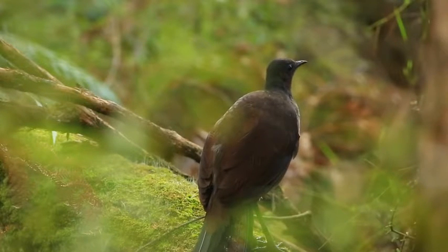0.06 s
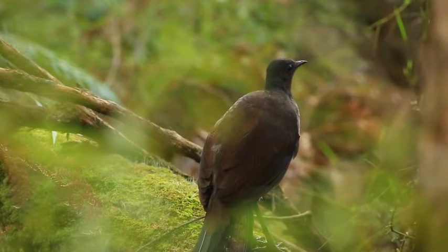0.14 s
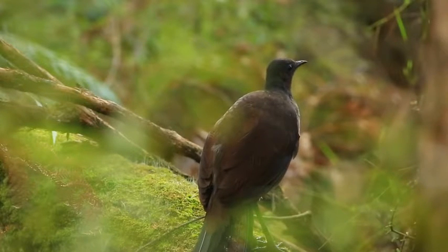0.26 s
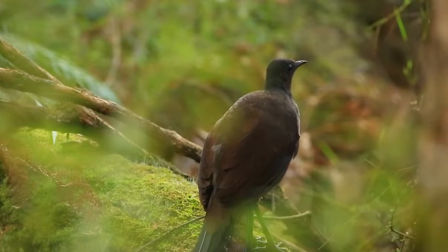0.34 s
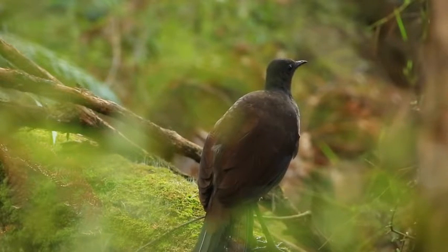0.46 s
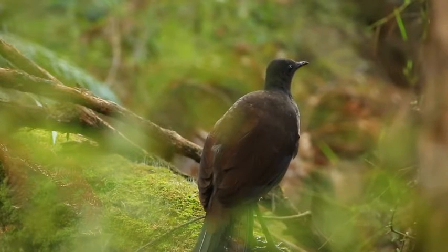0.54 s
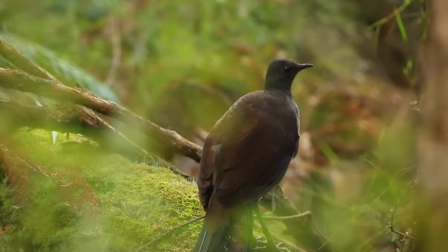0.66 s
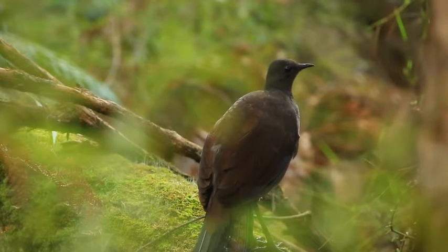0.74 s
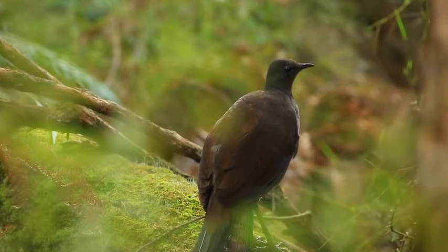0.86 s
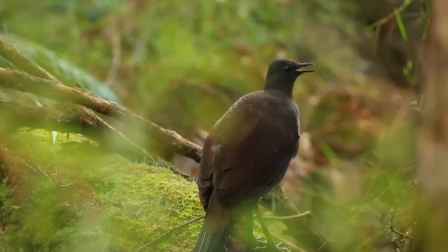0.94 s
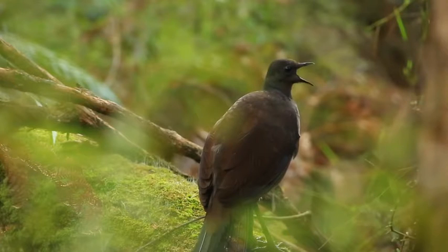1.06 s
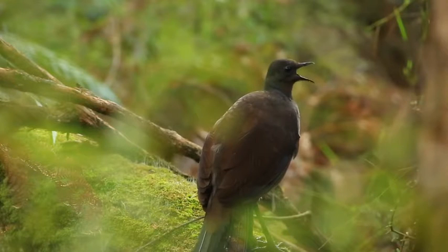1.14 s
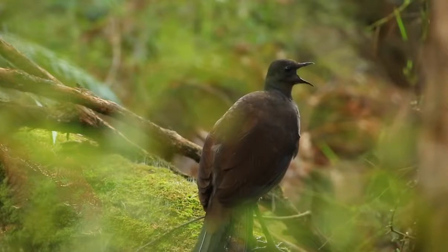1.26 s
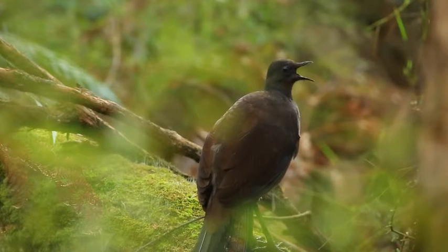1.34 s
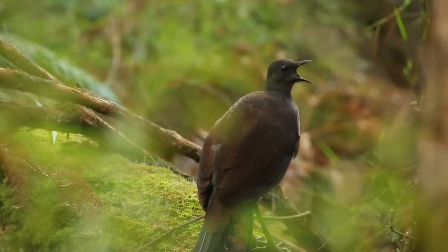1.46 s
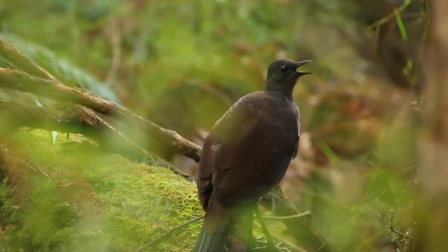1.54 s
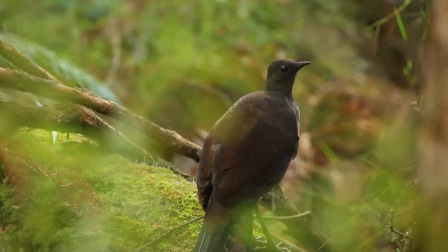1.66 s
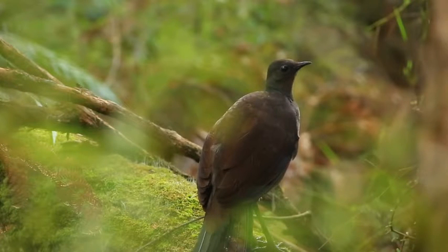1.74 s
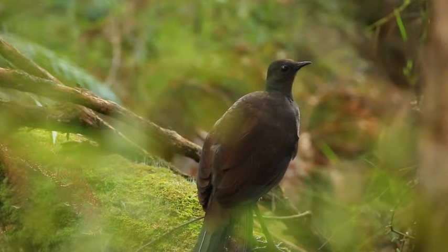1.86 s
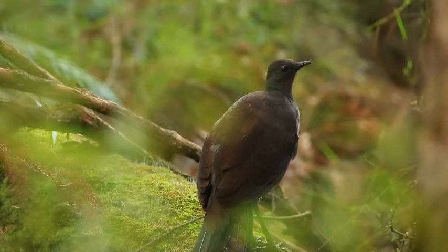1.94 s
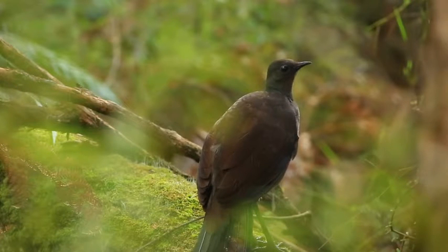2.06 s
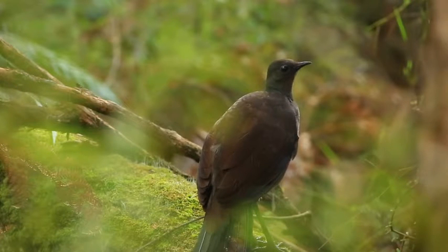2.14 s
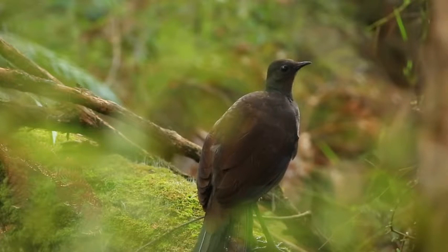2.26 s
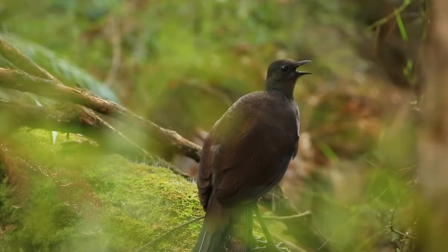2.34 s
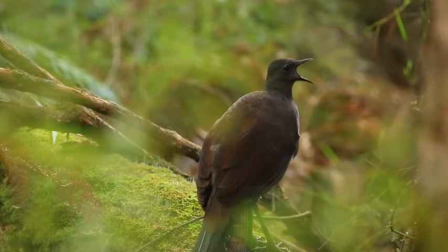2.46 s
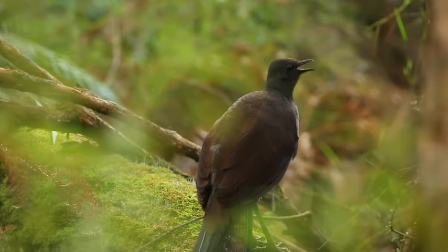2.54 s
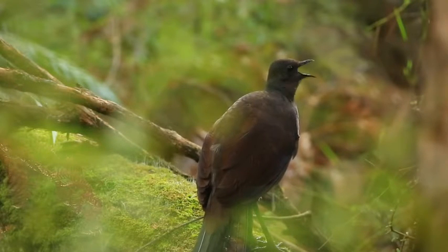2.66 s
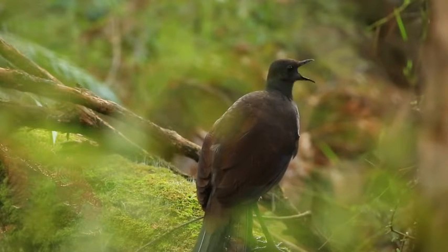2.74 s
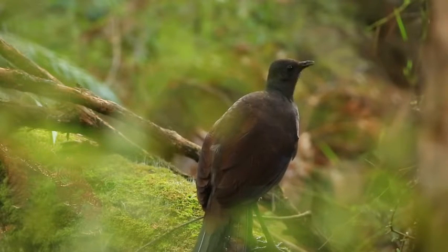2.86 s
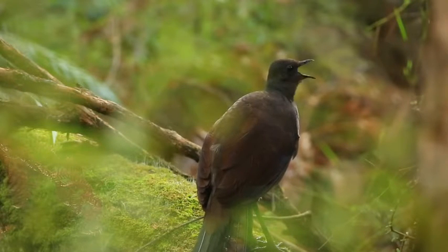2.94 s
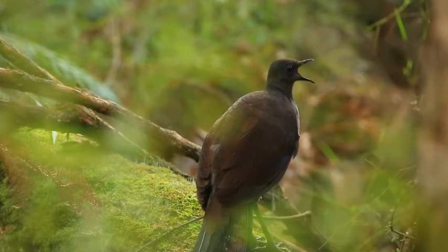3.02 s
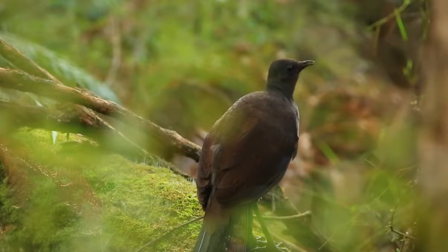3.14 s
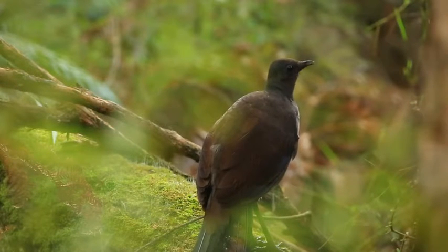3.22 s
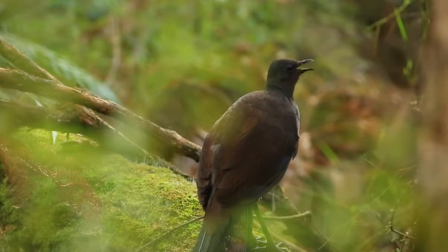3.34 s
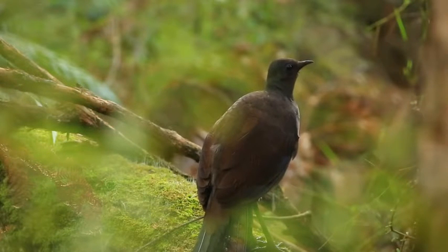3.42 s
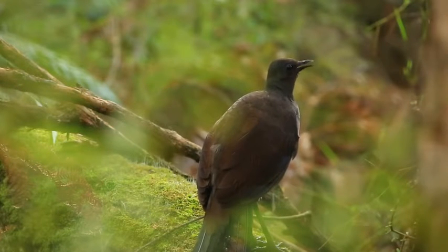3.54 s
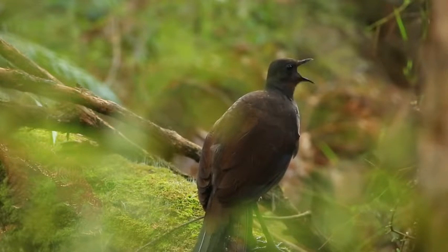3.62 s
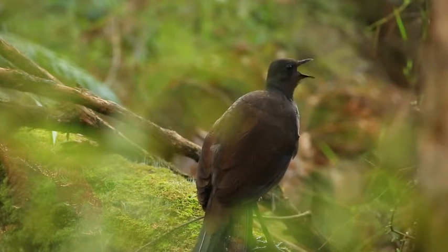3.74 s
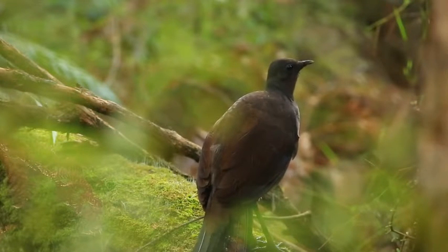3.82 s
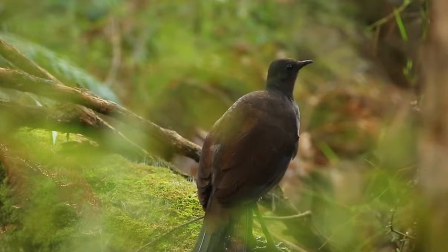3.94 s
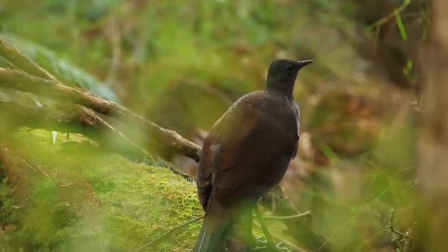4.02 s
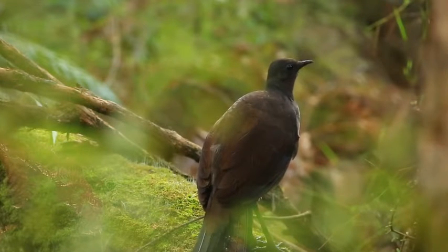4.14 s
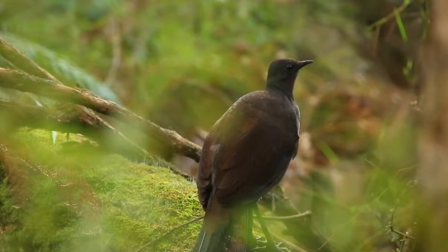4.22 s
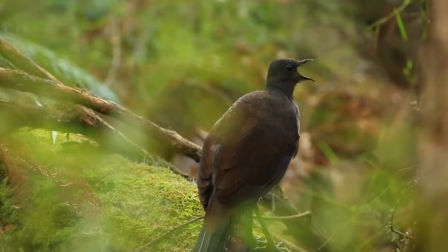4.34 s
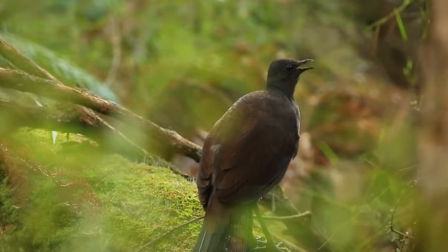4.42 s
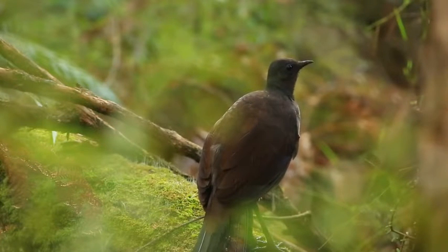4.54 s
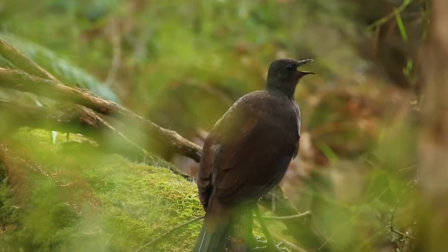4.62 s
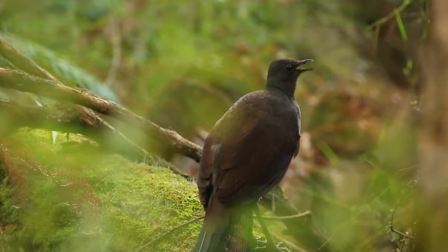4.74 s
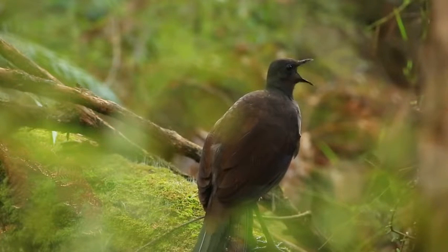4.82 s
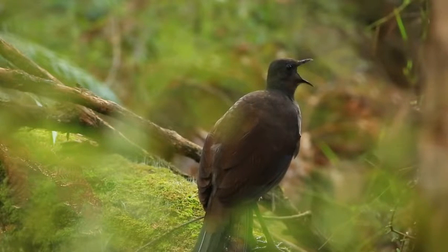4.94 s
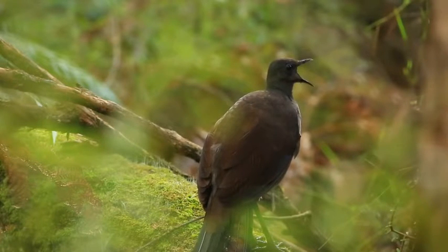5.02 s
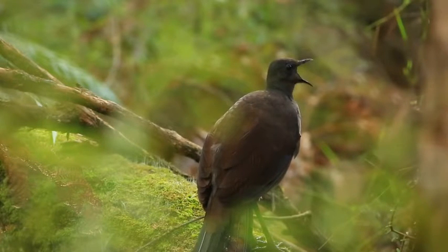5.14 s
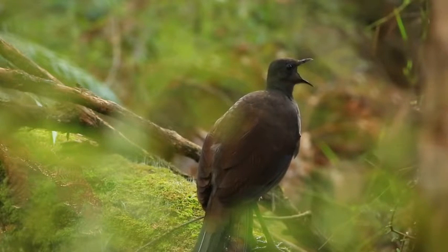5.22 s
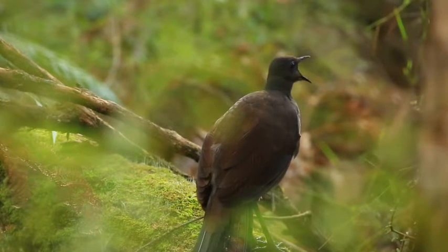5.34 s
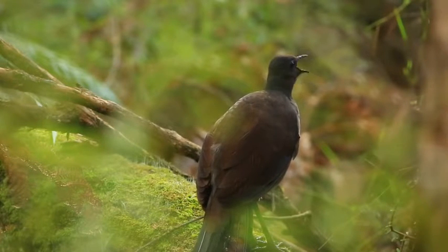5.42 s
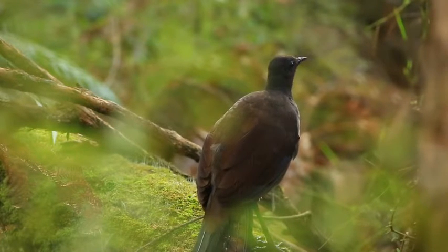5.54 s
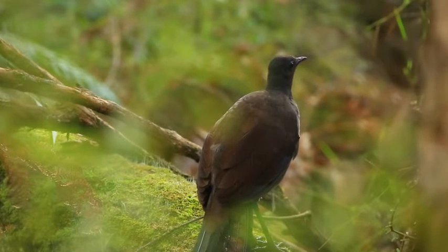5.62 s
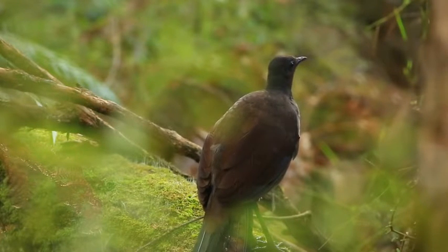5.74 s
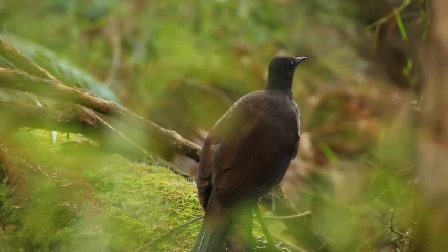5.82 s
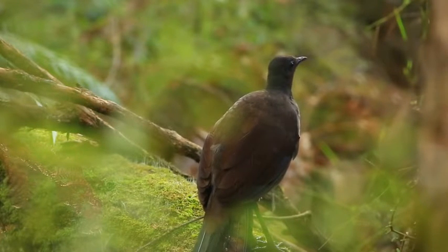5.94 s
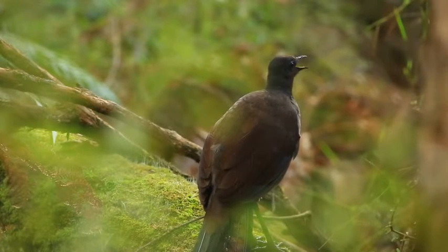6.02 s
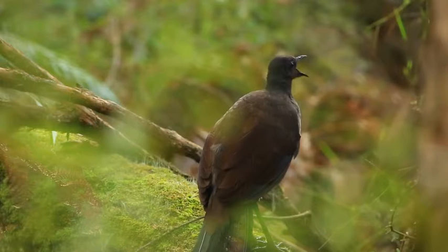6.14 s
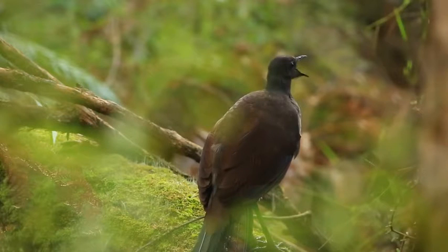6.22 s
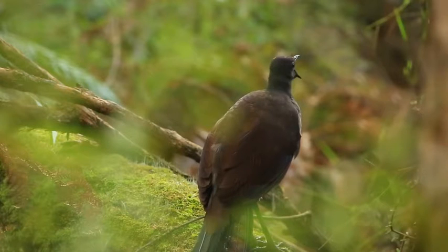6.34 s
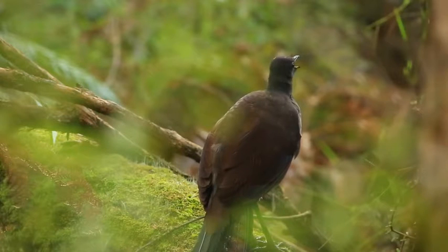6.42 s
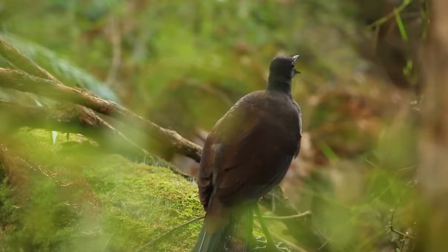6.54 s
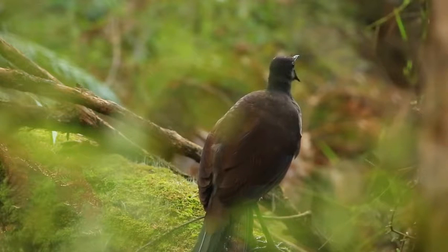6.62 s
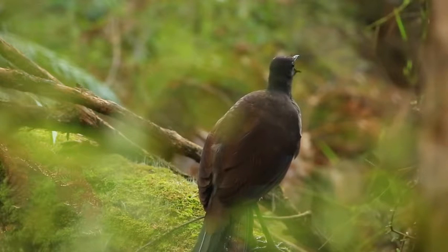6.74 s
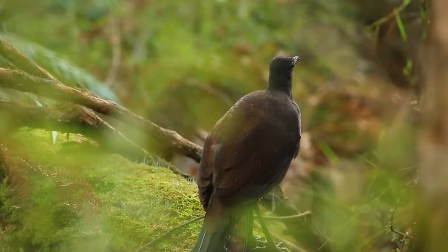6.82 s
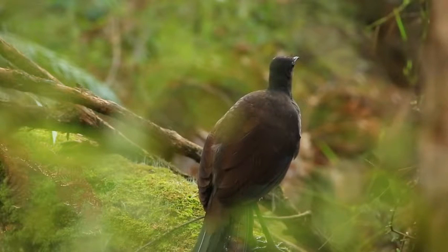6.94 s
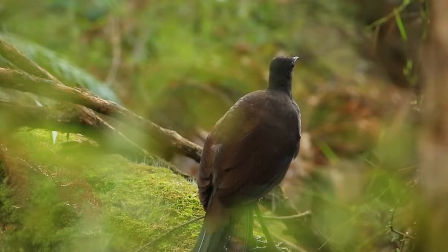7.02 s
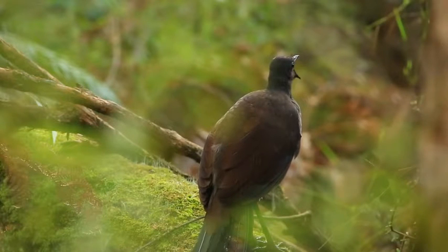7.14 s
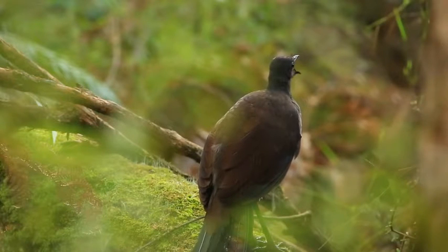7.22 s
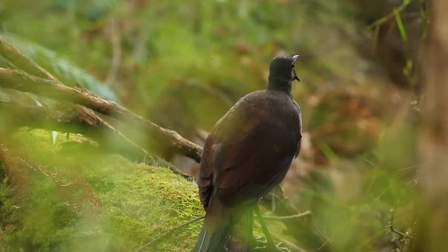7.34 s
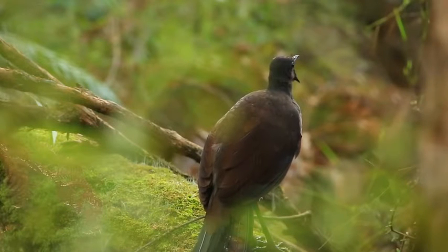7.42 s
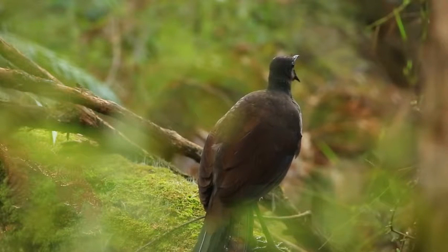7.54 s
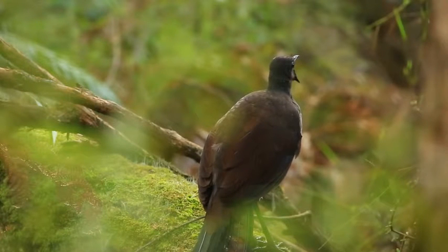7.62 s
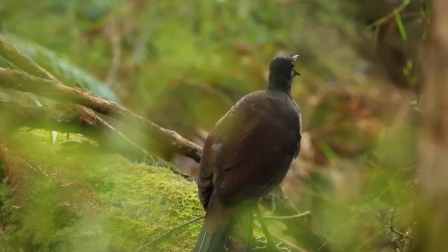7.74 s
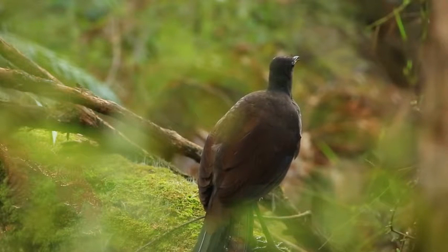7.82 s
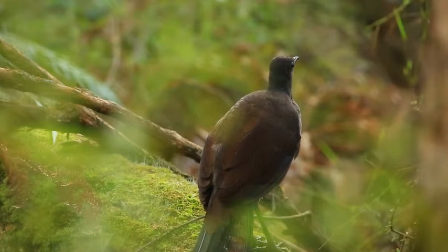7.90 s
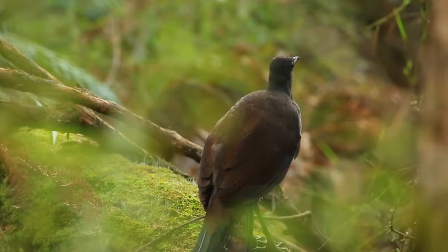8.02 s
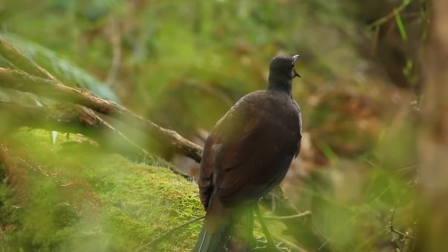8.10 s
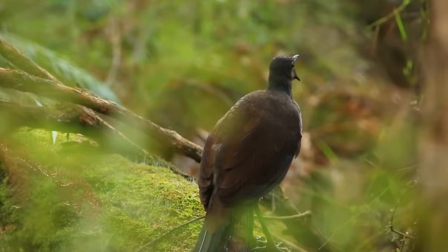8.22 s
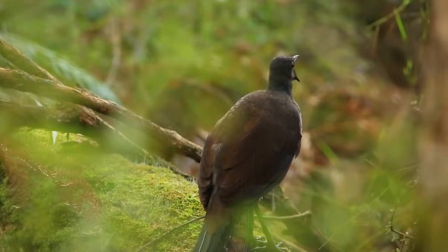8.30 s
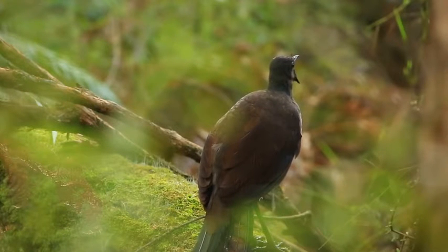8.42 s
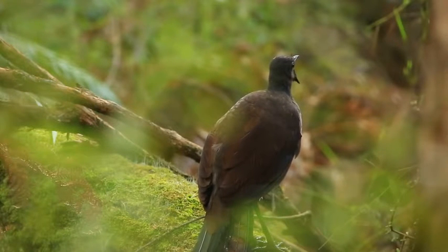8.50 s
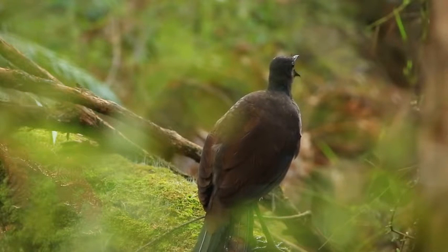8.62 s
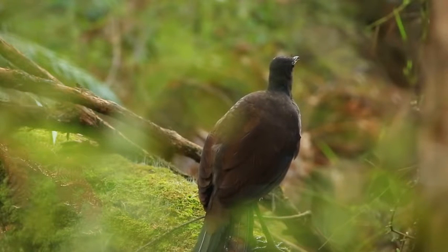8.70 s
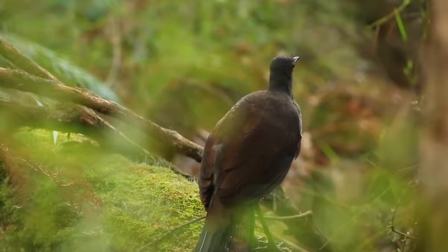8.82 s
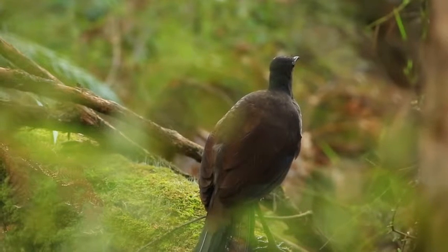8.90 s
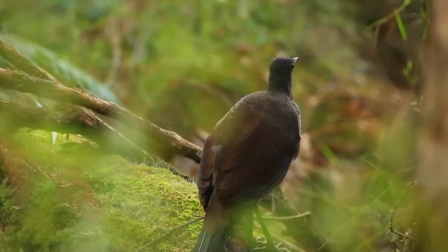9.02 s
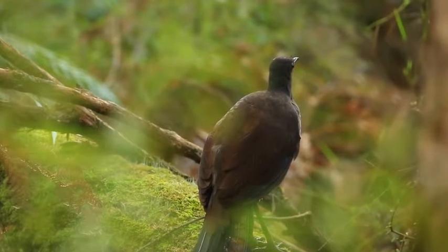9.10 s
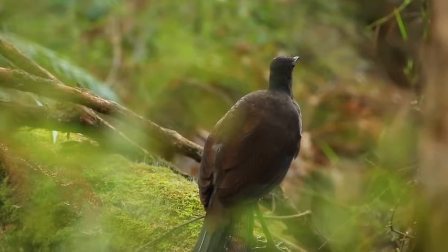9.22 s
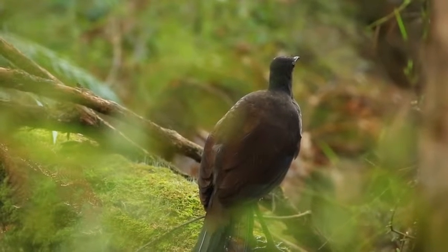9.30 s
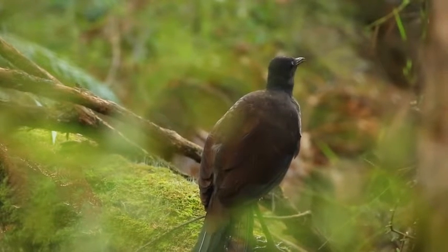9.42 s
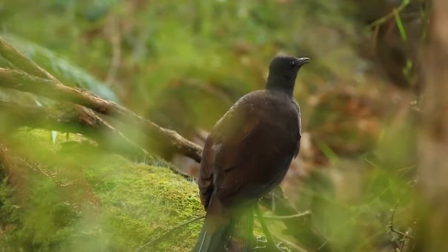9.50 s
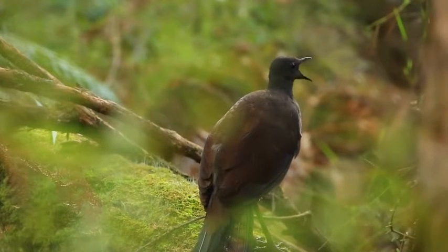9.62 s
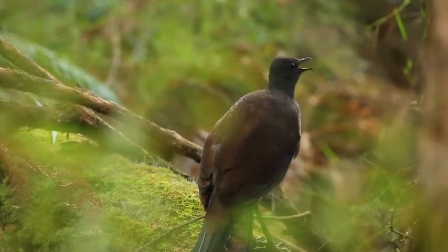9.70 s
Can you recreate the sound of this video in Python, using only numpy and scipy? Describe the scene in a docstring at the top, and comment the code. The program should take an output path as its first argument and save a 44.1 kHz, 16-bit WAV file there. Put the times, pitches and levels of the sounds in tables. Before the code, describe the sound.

In an echoing forest, a nearby bird utters low buzzy notes, harsh cracking chips and loud pitch-breaking whistles ending in rasps, over a soft stream-like murmur.

```python
"""In a forest, close to a bird: it sings whistles with sudden pitch breaks, low buzzy notes, harsh
rasps and clicks. Tones are sums of partials smeared by noise; rasps are pulse noise ringing a throat.
Ticks and rustles come from the undergrowth; farther off are one rising whip and faint gliding whistles.
Trees return a long scattered echo, made by sparse random taps; a stream of shaped noise murmurs behind."""
import sys
import numpy as np
from scipy import signal
from scipy.fft import rfft, irfft
from scipy.io import wavfile
from scipy.ndimage import uniform_filter1d

SR = 44100
rng = np.random.default_rng(int(sys.argv[2]) if len(sys.argv) > 2 else 0)


def master(y):
    """Save y as 16-bit WAV."""
    cut = np.clip(np.atleast_2d(y).T, -1, 1)
    pcm = np.round(cut * 32767)  # scale
    wavfile.write(sys.argv[1], SR, pcm.astype(np.int16))


N = 430416
EDGE_HZ = 15800  # upper band limit

# Long whistles: [extra roughness at the start, name of the overtone colour,
# (t/s, f/Hz, levels/dB of the fundamental, second and third partial)]
WHISTLES = [ (.01, "facing", [(4.905, 770, -49, -50.5, -48), (4.92, 1010, -34, -61, -63),
            (4.935, 1433, -27.5, -29, -31), (4.95, 1734, -29.5, -22.5, -32.5), (4.98, 1997, -26, -34, -39),
            (5.02, 2080, -18.5, -38, -44), (5.06, 2096, -15, -54, -41.5), (5.1, 2116, -11.5, -38, -44),
            (5.132, 2107, -16.5, -38, -45), (5.135, 2613, -15.5, -33, -46), (5.17, 2650, -18, -27.5, -46),
            (5.197, 2886, -24.5, -25, -44), (5.245, 2894, -10, -38, -47), (5.29, 2838, -27, -27.5, -45),
            (5.32, 2620, -14, -25, -46), (5.338, 2562, -19, -32, -43), (5.341, 2087, -13, -28, -40),
            (5.38, 2022, -17, -27.5, -36.5), (5.42, 1813, -27.5, -23, -34.5),
            (5.46, 1530, -27.5, -22.5, -43), (5.487, 1320, -21.5, -17, -48)]),
            (.01, "turned", [(6.34, 1298, -35, -42, -47), (6.37, 1360, -34.5, -43, -48),
            (6.4, 1670, -38, -30.5, -43), (6.42, 1773, -29.5, -36, -37.5), (6.46, 1662, -30, -31, -41),
            (6.5, 1649, -30.5, -33.5, -44.5), (6.55, 1527, -36, -35, -42), (6.6, 1381, -27.5, -55, -60),
            (6.68, 1320, -32.5, -45, -55), (6.74, 1447, -33, -33, -43), (6.772, 1435, -31, -27, -35)]),
            (.01, "aside", [(7.375, 1395, -49, -60, -56), (7.41, 1522, -41.5, -34, -44),
            (7.44, 1940, -26, -31, -47.5), (7.47, 1976, -16.5, -27, -53), (7.51, 1972, -19, -25, -45),
            (7.55, 1932, -14.5, -32, -44), (7.6, 1852, -31.5, -25.5, -33.5),
            (7.65, 1757, -26, -25.5, -28.5), (7.7, 1648, -22, -31, -40.5), (7.772, 1624, -24.5, -24, -31)]),
            (.5, "turned", [(8.3, 1400, -36, -34, -50), (8.33, 1587, -38, -35, -42),
            (8.37, 2000, -26, -32, -53), (8.405, 2224, -16.5, -34.5, -47), (8.408, 2650, -21, -33, -52),
            (8.44, 2740, -19, -33, -45), (8.46, 2687, -16.5, -33, -48), (8.475, 2658, -15.5, -48, -49),
            (8.53, 2604, -20.5, -32.5, -55), (8.575, 2554, -14, -31, -47), (8.579, 2157, -13, -32, -41),
            (8.615, 1980, -17.5, -22, -41), (8.64, 1830, -26, -29, -35), (8.678, 1795, -29, -22, -34)]), ]
# roughness of a settled whistle, and the time constant with which a hoarse start clears
CLEAR_ROUGHNESS, CLEARING_S = 0.015, 0.054
# Rasp under the hoarse start of a whistle: [t/s, level/dB, brightness/(dB per kHz)]
OPENING_RASP = [(8.285, -34, -18), (8.313, -26, -11), (8.33, -23, -0.9)]
# Rasp over a hoarse tone that ends each whistle: [start t/s, length t/s, first f/Hz, settled f/Hz,
# lowest f/Hz, last f/Hz, reference levels/dB of fundamental, second partial and rasp,
# brightness/(dB per kHz), factor on the roughness of the shared course]
ENDINGS = [(5.486, .083, 1310, 1235, 1084, 933, -28.5, -28, -23, -6.5, 0.8),
           (6.771, 0.13, 1186, 1111, 1051, 1294, -33, -33, -21, -1.76, 0.87),
           (7.772, .125, 1398, 1162, 1025, 1293, -31, -27, -22, -1.9, 1.1),
           (8.676, 0.12, 1513, 1322, 1053, 1520, -34, -32, -19.5, -1.4, 1.1)]
# Shared course of an ending: [share of its length, roughness, levels/dB relative to the row of
# fundamental, second partial and rasp]
ENDING_COURSE = [(0, 0.15, -2.5, -3, 4.5), (.16, .28, 4, 4.5, -2.5), (.7, .52, -10, 1.5, -3),
                 (1, 0.9, -4, 0, -13.5)]
# Harsh chips: [start t/s, buzz length t/s, buzz level/dB, crack level/dB, whistle length t/s,
# first f/Hz, shelf f/Hz, rise time constant t/s, later lift f/Hz, whistle level/dB,
# second partial level/dB, mid-whistle change of level/dB, its place 0-1, drop length t/s,
# closing rasp level/dB]
CHIPS = [(2.556, 0.041, -25, -20, 0.05, 1985, 2950, .009, 51.4, -19, -25, 5, 0.48, .012, -23),
         (2.836, 0.034, -30, -17, 0.052, 2134, 2880, 0.014, 59, -21.5, -30, -12, 0.47, .0055, -21),
         (3.118, .037, -29.5, -21, .049, 1996, 2860, .012, 139.5, -20, -28.5, -3.5, 0.59, .008, -19.5),
         (3.773, 0.04, -29, -14, 0.057, 2170, 2820, 0.015, 185, -20.5, -26, -7, 0.69, .008, -17.5)]
# the low and the high voice of the buzz: pitch, roughness, change of length against the buzz
BUZZ_HZ, BUZZ_ROUGHNESS, BUZZ_OVERLAP_S = (1010, 1764), (0.52, 0.82), (.004, -.0012)
# Course of a buzz: [share of its length, pitch ratio, levels/dB relative to the buzz of the low voice,
# high voice, overtones and rasp]
BUZZ_COURSE = [(0, .985, 0, 1.5, -0.5, -8), (.5, 1.003, -3.5, -5.5, -2.5, -7),
               (.85, 1.04, -3.5, 1, 3, -7.5), (1, 1.11, 7, 7, 1.5, -4)]
# the crack's level is reached half of CRACK_S into the whistle; both ends of the whistle are softened
CRACK_S, SWEEP_EDGE_S, SWEEP_START_DB, SWEEP_END_DB = 0.012, 0.0022, -23.5, -6
CHANGE_WIDTH = 0.17  # as a share of the whistle
# the drop after the whistle, levels relative to it, and the closing rasp's fade
DROP_HZ, DROP_ROUGHNESS, DROP_DB, DROP_SECOND_DB = 1028, .07, -10, -4
CLOSE_S, CLOSE_FADE_DB = 0.041, -20
# Low buzzy notes; the third partial grows as the beak opens: [t/s, f/Hz, roughness,
# levels/dB of the second and third partial]
LOW_NOTES = [
    [(1.115, 442.6, 0.3, -43, -59), (1.15, 451, .3, -46, -61), (1.175, 523, 0.24, -41, -43),
     (1.2, 588, 0.2, -42, -37.5), (1.23, 611, 0, -34.5, -40.5), (1.262, 543, 0.37, -42, -41)],
    [(1.327, 473, 0.31, -41, -50), (1.38, 493, 0.2, -35.5, -51), (1.405, 596, 0.3, -41, -37),
     (1.43, 645, .13, -34, -36), (1.455, 530, 0, -42, -52), (1.475, 482, 0, -39.5, -45)],
    [(1.54, 446, 0.37, -46, -45), (1.58, 456, 0.31, -43, -51), (1.615, 464, 0.27, -43, -51)],
    [(4.498, 670, 0.2, -37, -42.5), (4.52, 620, 0, -36, -45.5), (4.54, 546, 0, -49, -45),
     (4.56, 453, 0, -54, -51)],
    [(4.8, 627, 0.1, -35.5, -48), (4.85, 696, 0.12, -37.5, -43.5), (4.905, 733, 0, -55.5, -44.5)],
    [(6.2, 625, 0.77, -48, -60), (6.272, 587, 0.3, -44, -52), (6.3, 643, 0, -36.5, -44),
     (6.335, 854, 0.2, -43, -41)],
    [(7.25, 602, 0.75, -46, -58), (7.29, 717, 0.53, -44, -57), (7.32, 806, 0.26, -40, -39),
     (7.37, 850, 0, -50, -40)],
    [(8.26, 803, .57, -41, -54), (8.29, 889.3, 0.23, -34.5, -45), (8.325, 1064, 0.04, -27, -35)],
]
LOW_FUNDAMENTAL_DB = -7  # against the second partial
# Quick chirps: [t/s, f/Hz, roughness, level/dB of the fundamental]
CHIRPS = [
    [(2.664, 1510, .5, -42), (2.686, 750.1, 0.7, -41)],
    [(2.936, 1430, 0.54, -44), (2.956, 1150, 0.6, -35)],
    [(2.823, 4008, .06, -26), (2.829, 3940, .06, -25), (2.835, 2140, .06, -28)],
    [(3.098, 1240, .06, -63), (3.107, 3280, 0.1, -40), (3.113, 3740, .06, -23.5), (3.118, 2040, .06, -29)],
    [(3.226, 1400, .5, -63), (3.24, 1140, 0.7, -26.5)],
    [(3.422, 1086, .06, -49), (3.433, 980, .06, -38), (3.443, 1290, 0.1, -38)],
    [(3.445, 2290, .06, -35), (3.449, 3230, .06, -29), (3.453, 3660, .06, -48)],
    [(3.465, 2400, .06, -45), (3.48, 2034, 0.13, -34.5), (3.496, 1750, .06, -42)],
    [(3.755, 1910, .06, -48), (3.76, 3350, .06, -34), (3.765, 3570, 0.1, -27), (3.772, 2200, .06, -29)],
    [(3.885, 1200, 1.11, -17.5), (3.897, 1430, 0.6, -30)],
    [(9.608, 1128, .83, -44), (9.635, 794, 0.7, -37), (9.66, 747, 0.5, -34.5)],
]
CHIRP_SECOND_DB = -26  # against the fundamental
# Voiced clicks, a few cycles of the membrane: [t/s, level/dB, f/Hz, brightness/(dB per octave)]
CLICKS = [(1.277, -16.5, 1113, 0.5), (1.481, -16, 1114, 1), (1.629, -13.5, 1088, 2.7)]
# Spectrum of a click before its brightness: [level/dB], one value for each partial from 1 to 11
CLICK_PARTIALS = [10.5, 11.5, 0, 2, -8, -5.5, -15, -18, -21, -27.5, -25]
# Overtone colour of throat and beak for each way of singing and turn of the head: [f/Hz, level/dB]
COLOURS = { "facing": [(4000, 11), (5300, -8), (6300, -7), (7200, -14.5), (8400, -19.5), (10500, -17),
           (11500, -16), (14500, -37.5)], "turned": [(4000, -1.5), (5300, -13.5), (6500, -23), (8000, -27),
           (10800, -32.5), (13500, -40)], "aside": [(4500, 10), (5500, -11.5), (6600, -23), (8000, -19),
           (9800, -28.5), (13500, -40)], "quick": [(2000, 11), (3000, -6), (4500, -5), (6000, -5.5),
           (7500, -17.5), (9000, -22), (12000, -27), (15000, -48)], "hoarse": [(2000, 9), (2600, -1.5),
           (3300, -17.5), (4300, -15), (5500, -15), (7500, -19)], "low": [(1350, -0.5), (1800, -2),
           (2400, 0.5), (2900, -11.5), (3600, -5.5), (5500, -28)], "buzz": [(2050, -17), (3050, -2),
           (3500, -16), (4100, -6.5), (5200, -6), (7000, -18.5), (8700, -18.5)], }
# Partials above the fifth: [f/Hz above the fifth, level/dB relative to the fifth]
UPPER_PARTIALS = [(500, -3), (2000, -9), (5000, -25.5), (12000, -48)]
# Colour of a rasp through throat and open beak: [f/Hz, relative level/dB]
THROAT = [(500, -64), (900, -23), (1400, -6.5), (2100, 3.5), (2800, -2), (3600, 1.5), (4400, -6),
          (5500, -13.5), (7000, -20), (15000, -32.5)]
# Small ticks and rustles in the undergrowth: [t/s, initial level/dB, centre f/Hz, width f/Hz, T60 t/s]
TICKS = [(3.594, -51, 8400, 2500, .02), (4.603, -54, 10090, 3000, .02), (4.638, -47, 9400, 3500, 0.0094),
         (8.961, -41, 90, 120.9, 0.28), (9.581, -32, 1190, 500, 0.03), (9.602, -28.5, 1110, 500, 0.053),
         (9.62, -38, 696, 1190, 1), (9.693, -35, 3720, 2497, 0.018), (9.716, -25.5, 1500, 6730, 0.018),
         (9.7178, -26, 380, 400, 0.024), (9.727, -47, 1200, 6000, 0.027), (9.752, -33, 900, 1500, 0.067)]
# The beak aims its treble at the trees: [f/Hz, level/dB]
ECHO_COLOUR = [(600, -5), (2000, -1), (5000, 4), (12000, 5)]
# Decay of the forest echo: [f/Hz, T60 t/s]
TREE_DECAY = [(500, 0.16), (1200, 1.18), (2500, 1.08), (5500, 1.014), (12000, 0.5)]
# Echo still hanging from a whistle sung just before: [f/Hz, width f/Hz, initial level/dB, T60 t/s]
HANGING = [(2860, 160, -33, 1.26), (5660, 170, -57.5, 0.744), (2000, 1060, -48.5, 0.81)]
# The far bird's whip: [t/s, f/Hz, source level/dB before the mix]
WHIP = [(5.845, 1063, -33.5), (5.87, 1587, -38.5), (5.888, 2286, -33), (5.9, 3720, -32.5),
        (5.906, 4860, -37), (5.914, 6540, -36)]
# Faint far whistles: [start t/s, end t/s, start f/Hz, end f/Hz, source level/dB before the mix]
FAR_WHISTLES = [(0.458, 0.529, 1700, 1520, -58.5), (0.657, .73, 2000, 2850, -60),
                (2.2, 2.559, 2890, 2870, -74), (2.281, 2.326, 1774, 1413, -52),
                (2.466, 2.547, 2250, 1470, -56), (3.561, 3.653, 2230, 1497, -52.5),
                (4.62, 4.8, 2860, 2860, -63.5)]
# Spectrum of the stream: [f/Hz, relative level/dB per Hz]
STREAM_SPECTRUM = [(15, -56), (25, -45), (48, -11), (144, -11), (324, -1), (473, -4.5), (513, -9.5),
                   (604, 0), (691, -7), (769, -14.5), (1510, -13), (2810, -20), (3220, -23), (5670, -28),
                   (15800, -35)]
STREAM_DB = -46  # rms level


def song():
    """Superposition: every note of the near bird, as (start in s, sound)."""
    parts = [whistle(*row) for row in WHISTLES]
    parts.append(rasp(OPENING_RASP))
    parts += [click(*row) for row in CLICKS]
    parts += [low_note(rows) for rows in LOW_NOTES]
    parts += [chirp(rows) for rows in CHIRPS]
    for row in ENDINGS:
        parts += ending(*row)
    for row in CHIPS:
        parts += chip(*row)
    return parts


def whistle(hoarse, colour, rows):
    """Exponential relaxation: the hoarse start of a long note settles into a clear tone."""
    s, hz, *partial_db = np.transpose(rows)
    rough = CLEAR_ROUGHNESS + hoarse * np.exp(-(s - s[0]) / CLEARING_S)
    return note(np.transpose([s, hz, rough, *partial_db]), colour)


def ending(start, length, first_hz, settled_hz, lowest_hz, last_hz,
           tone_db, second_db, rasp_db, tilt_db, hoarse):
    """Change of register: a hoarse tone sounds under a rasp that fades."""
    share, rough, tone_course, second_course, rasp_course = np.transpose(ENDING_COURSE)
    s = start + length * share
    hz = [first_hz, settled_hz, lowest_hz, last_hz]
    tone = np.c_[s, hz, hoarse * rough, tone_db + tone_course, second_db + second_course]
    return [note(tone, "hoarse"), rasp(np.c_[s, rasp_db + rasp_course, tilt_db + 0 * s])]


def chip(start, buzz_s, buzz_db, crack_db, sweep_s, first_hz, shelf_hz, rise_s, lift_hz,
         sweep_db, second_db, change_db, change_at, drop_s, close_db):
    """Two voices to one: a hoarse buzz cracks into a rising whistle, which drops and ends in a rasp."""
    crack = start + buzz_s
    end = crack + sweep_s
    sweep = upsweep(crack, sweep_s, first_hz, shelf_hz, rise_s, lift_hz,
                    sweep_db, second_db, change_db, change_at)
    drop = (end + drop_s, DROP_HZ, DROP_ROUGHNESS, sweep_db + DROP_DB, second_db + DROP_SECOND_DB)
    closing = [(end, close_db, .2), (end + CLOSE_S, close_db + CLOSE_FADE_DB, .2)]
    return buzz(start, buzz_s, buzz_db, crack_db) + [note(np.vstack([sweep, drop]), "quick"), rasp(closing)]


def buzz(start, length, level_db, crack_db):
    """Two independent sources: a low and a high hoarse voice sound together, with a rasp that cracks."""
    share, ratio, *voices_db, overtone_db, rasp_db = np.transpose(BUZZ_COURSE)
    parts = []
    for hz, rough, overlap_s, voice_db in zip(BUZZ_HZ, BUZZ_ROUGHNESS, BUZZ_OVERLAP_S, voices_db):
        s = start + (length + overlap_s) * share
        second_db = level_db + overtone_db + read(COLOURS["buzz"], 2 * hz)
        rows = np.c_[s, hz * ratio, rough + 0 * share, level_db + voice_db, second_db]
        parts.append(note(rows, "buzz"))
    # the rasp skips the last row of the course and heads for the crack
    hiss = [(start + length * u, level_db + db, .6) for u, db in zip(share[:-1], rasp_db)]
    crack = (start + length + CRACK_S / 2, crack_db, .3)
    return parts + [rasp(hiss + [crack])]


def upsweep(start, length, first_hz, shelf_hz, rise_s, lift_hz, level_db, second_db, change_db, change_at):
    """Frequency modulation: pitch relaxes to a shelf, then steps further while the level dips or swells."""
    t = np.linspace(0, length, num=16)
    past_change = (t / length - change_at) / CHANGE_WIDTH
    hz = shelf_hz + (first_hz - shelf_hz) * np.exp(-t / rise_s)
    hz = hz + lift_hz * (1 + np.tanh(past_change)) / 2
    edge_db = SWEEP_START_DB * np.exp(-t / SWEEP_EDGE_S)
    edge_db = edge_db + SWEEP_END_DB * np.exp((t - length) / SWEEP_EDGE_S)
    db = level_db + edge_db + change_db * np.exp(-past_change ** 2)
    return np.c_[start + t, hz, CLEAR_ROUGHNESS + 0 * t, db, second_db + edge_db / 2]


def low_note(rows):
    """Resonant emphasis: the fundamental lies below the second partial."""
    full = [(s, hz, rough, db + LOW_FUNDAMENTAL_DB, db, third_db) for s, hz, rough, db, third_db in rows]
    return note(full, "low")


def chirp(rows):
    """Rapid glide: a fast change of pitch with a second partial at a fixed ratio."""
    return note([(*row, row[-1] + CHIRP_SECOND_DB) for row in rows], "quick")


def note(rows, colour, waver=0.0013, rough_hz=600, spread=0.0034, steady=0.68):
    """Harmonic series of a membrane: roughness smears each partial into a narrow noise band."""
    s, (hz, rough, *partial_db) = unroll(rows)
    hz = uniform_filter1d(hz, size=60, mode="nearest")
    tremble = evened(uniform_filter1d(rng.standard_normal(len(hz)), size=80))
    turns = np.cumsum(hz * (1 + waver * tremble)) / SR
    # partials up to the fifth that are not given follow the colour
    for k in range(len(partial_db), 5):
        step_db = read(COLOURS[colour], k * hz + hz) - read(COLOURS[colour], k * hz)
        partial_db.append(partial_db[-1] + step_db)
    for above in range(1, int(EDGE_HZ / hz.min()) - 4):
        partial_db.append(partial_db[4] + read(UPPER_PARTIALS, above * hz))
    k = np.arange(1, len(partial_db) + 1)[:, None]
    # the fundamental stays the steadiest, high partials break up first
    smear = np.clip(rough * np.where(k == 1, steady, np.sqrt(k)) + spread * k, 0, 1)
    size = np.sqrt(1 - smear ** 2) + smear * wobble((len(k), len(hz)), rough_hz)
    amplitude = gain_of(partial_db) * (k * hz < EDGE_HZ) * size
    partials = amplitude * np.exp(1j * (2 * np.pi * k * turns + k * k))
    return s, np.sqrt(2) * partials.real.sum(0) * edges(len(hz), 0.0012)


def rasp(rows, pulses_per_s=5000, spread_db=0.5, clump=0.85, clump_hz=220):
    """Source and filter: clumped irregular pulses ring the throat, whose brightness drifts."""
    s, (db, tilt_db) = unroll(rows)
    count = len(db)
    draw = rng.random((count, 3))
    fires = draw[:, 0] < pulses_per_s / SR
    sizes = gain_of(-spread_db * np.log(draw[:, 2] + .05))
    pulses = fires * np.sign(draw[:, 1] - .5) * sizes
    pulses *= abs(1 + clump * wobble(count, clump_hz))
    f, t, z = signal.stft(pulses, SR, nperseg=256, noverlap=192)
    slope_db = tilt_db[np.minimum((t * SR).astype(int), count - 1)]
    # brightness tilts the throat's spectrum above 2500 Hz
    colour_db = read(THROAT, f)[:, None] + slope_db * np.maximum(f - 2500, 0)[:, None] / 1000
    shaped = signal.istft(z * gain_of(colour_db), SR, nperseg=256, noverlap=192)[1][:count]
    return s, gain_of(db) * evened(shaped) * edges(count, 0.0064)


def click(s, db, hz, tilt_db):
    """Damped transient: a ragged stack of partials lasts about three cycles."""
    t = np.arange(500) / SR
    k = np.arange(1, len(CLICK_PARTIALS) + 1)[:, None]
    partial_db = np.array(CLICK_PARTIALS)[:, None] + tilt_db * np.log2(k)
    size = gain_of(partial_db) * (2.0 + wobble((len(k), len(t)), 2300))
    stack = (size * np.exp(1j * (2 * np.pi * k * hz * t + k * k))).real
    u = t / 0.00089  # the envelope peaks after 0.89 ms
    return s, gain_of(db) * evened(stack.sum(0)) * u * np.exp(1 - u) / 2


def tick(s, db, hz, width, t60):
    """Exponential decay: a short puff of band noise rises quickly and dies."""
    t = np.arange(round(t60 * SR)) / SR
    noise = band(4 * len(t), hz, width)[:len(t)]
    return s, gain_of(db - 60 * t / t60) * noise * (1 - np.exp(-t / (0.041 * t60)))


def nearby(x, t60=0.11):
    """Early reflection: ground and branches close to the bird give a short dense echo."""
    t = np.arange(SR // 8) / SR
    taps = rng.standard_normal(len(t)) * (rng.random(len(t)) < .03)
    taps = taps * gain_of(-60 * t / t60) * (t > .002)
    return signal.fftconvolve(x, taps / np.linalg.norm(taps))[:N]


def trees(x, gap_s, soft_s):
    """Multiple scattering: sparse random-sign taps swell in after a gap, each band with its own decay."""
    taps = np.zeros(2 * SR)
    at = np.arange(0, 2 * SR - 20, 20)
    at = at + rng.integers(0, 20, len(at))
    taps[at] = rng.choice([-1., 1.], len(at))
    hz, t, z = signal.stft(taps, SR, nperseg=256)
    decay = gain_of(-60 * t / read(TREE_DECAY, hz)[:, None])
    tail = signal.istft(z * decay, SR, nperseg=256)[1]
    after_gap = np.maximum(np.arange(len(tail)) / SR - gap_s, 0)
    tail = tail * (1 - np.exp(-after_gap / soft_s))
    return signal.fftconvolve(x, tail / np.linalg.norm(tail))[:N]


def hanging_echo():
    """Free decay: narrow noise bands die away exponentially."""
    t = np.arange(N) / SR
    return sum(gain_of(db - 60 * t / t60) * band(N, hz, width) for hz, width, db, t60 in HANGING)


def far_birds():
    """Random amplitude and phase modulation: the whip and faint glides flutter, before their echo."""
    out = np.zeros(N)
    s, (hz, db) = unroll(WHIP)
    add(out, s, gain_of(db) * fluttering(hz, 730) * edges(len(hz), 0.0016))
    for start, end, start_hz, end_hz, db in FAR_WHISTLES:
        hz = np.linspace(start_hz, end_hz, round((end - start) * SR))
        add(out, start, np.sqrt(2) * gain_of(db) * fluttering(hz, 124) * edges(len(hz), 0.013))
    return out


def fluttering(hz, width_hz):
    """Phasor sum: a gliding tone is multiplied by one plus slow complex noise."""
    carrier = np.exp(2j * np.pi * np.cumsum(hz) / SR)
    return ((1 + .5 * wobble(len(hz), width_hz)) * carrier).real


def stream(patchy_db=1.46, swell_db=.5):
    """Spectral shaping: random short-time spectra carry drifting patches and a slow swell."""
    frames, hz = N // 512 + 5, np.fft.rfftfreq(2048, 1 / SR)
    a, b, patches = rng.standard_normal((frames, len(hz), 3)).T
    patches = uniform_filter1d(patches, size=12, axis=0)
    patches = evened(uniform_filter1d(patches, size=6, axis=1))
    swell = evened(uniform_filter1d(rng.standard_normal(frames), size=30))
    level_db = read(STREAM_SPECTRUM, hz)[:, None] + patchy_db * patches + swell_db * swell
    z = (a + 1j * b) * gain_of(level_db)
    return gain_of(STREAM_DB) * evened(signal.istft(z, nperseg=2048, noverlap=1536)[1][:N])


def band(count, hz, width):
    """Resonance: noise is filtered around one frequency and brought to rms 1."""
    f = np.fft.rfftfreq(count, 1 / SR)
    resonance = 1 / (1 + (2 * (f - hz) / width) ** 2)
    return evened(irfft(rfft(rng.standard_normal(count)) * resonance, count))


def wobble(shape, width_hz):
    """Narrow-band noise: complex noise of power 1 is low-passed twice along the last axis."""
    r = np.exp(-np.pi * width_hz / SR)
    z = rng.standard_normal(shape) + 1j * rng.standard_normal(shape)
    z = signal.lfilter([1], [1, -2 * r, r * r], z)
    return z * np.sqrt((1 - r * r) ** 3 / (2 + 2 * r * r))


def edges(count, fade_s):
    """Amplitude window: a short smooth fade at both ends."""
    k = np.arange(count)
    return np.sin(np.pi / 2 * np.clip(np.minimum(k, k[::-1]) / (fade_s * SR), 0, 1)) ** 2


def unroll(rows):
    """Linear interpolation: the start time, and every other column at the sample rate."""
    s, *columns = np.transpose(rows)
    t = np.arange(s[0], s[-1], 1 / SR)
    return s[0], [np.interp(t, s, c) for c in columns]


def read(points, hz):
    """Logarithmic frequency scale: a curve is interpolated over log frequency."""
    f, value = np.transpose(points)
    return np.interp(np.log(hz + 1), np.log(f + 1), value)


def gain_of(db):
    """Decibel law: level to amplitude."""
    return 10 ** (np.asarray(db) / 20)


def evened(x):
    """Normalisation: scale to rms 1."""
    return x / np.sqrt(np.mean(x ** 2) + 1e-20)


def add(mix, s, sound):
    """Superposition: add a sound at its start time, cut at the end of the mix."""
    part = mix[round(s * SR):][:len(sound)]
    part += sound[:len(part)]


def scene():
    """Direct and reflected sound: near bird and ticks, far birds, echoes and stream add up."""
    bird = np.zeros(N)
    for part in song() + [tick(*row) for row in TICKS]:
        add(bird, *part)
    colour = gain_of(read(ECHO_COLOUR, np.fft.rfftfreq(N, 1 / SR)))
    sent = irfft(rfft(bird) * colour, N)
    near = bird + gain_of(-6.0) * nearby(sent) + gain_of(-12.5) * trees(sent, gap_s=0.01, soft_s=0.0024)
    far = far_birds()
    far = gain_of(-1.5) * far + trees(far, gap_s=.001, soft_s=.004)
    return (near + far + hanging_echo() + stream())[None]


def record(dry):
    """Band limitation: a linear-phase low-pass removes what lies above the edge."""
    lowpass = signal.firwin(511, EDGE_HZ, window=("kaiser", 9), fs=SR)
    return signal.oaconvolve(dry, lowpass[None], "same")


dry = scene()
out = record(dry)
master(out)
```